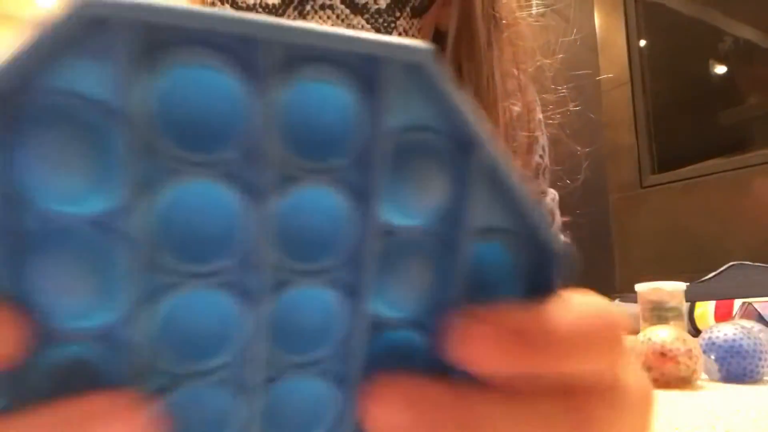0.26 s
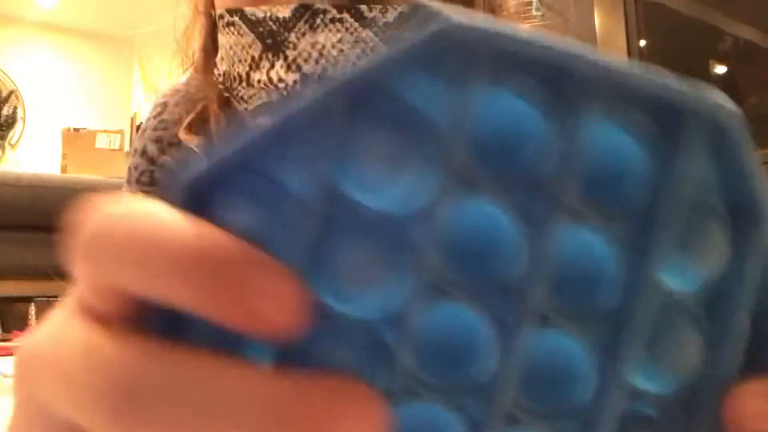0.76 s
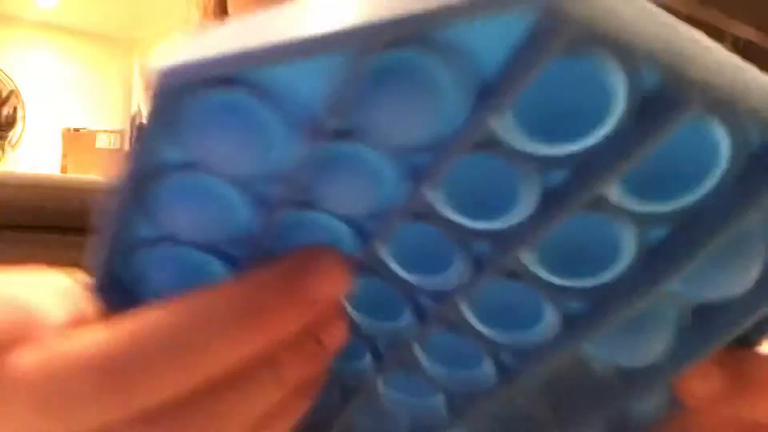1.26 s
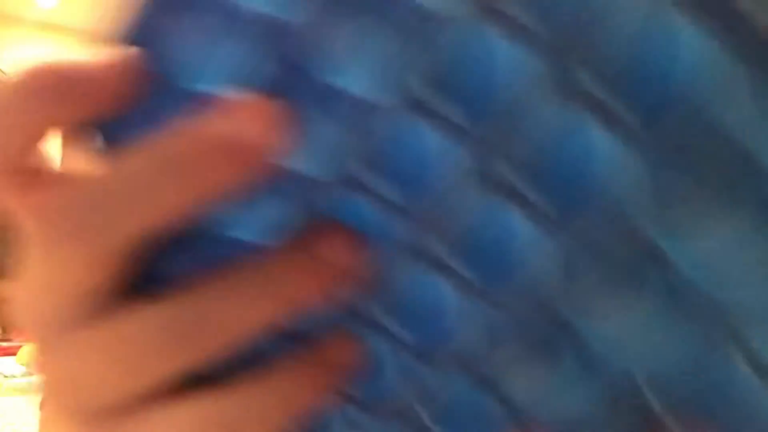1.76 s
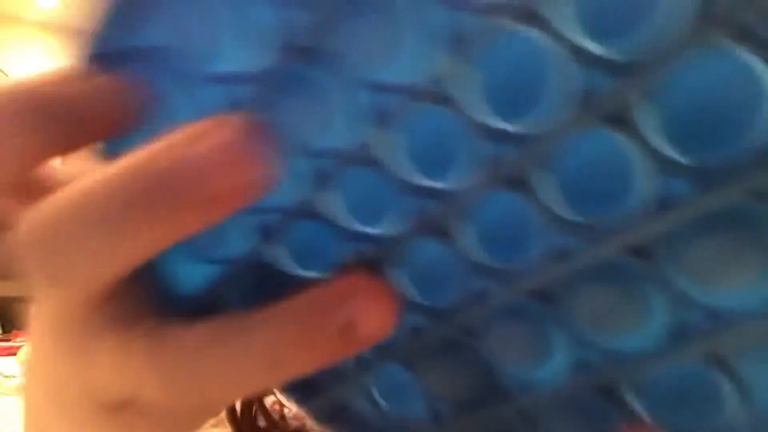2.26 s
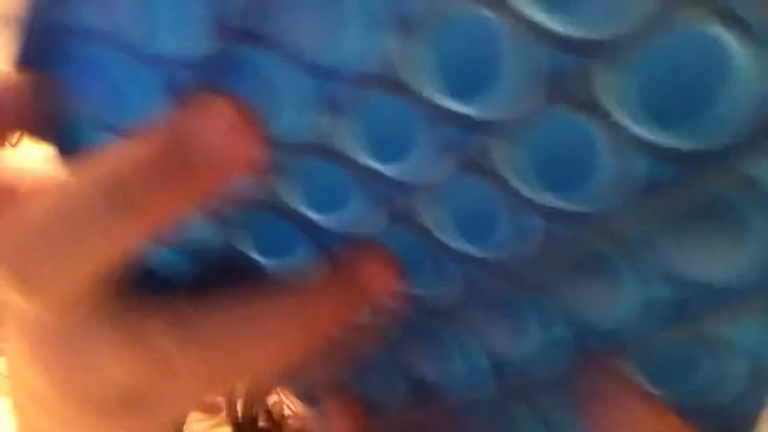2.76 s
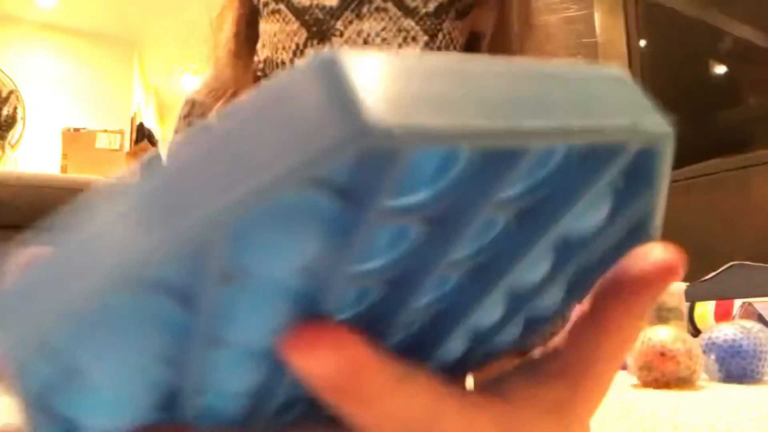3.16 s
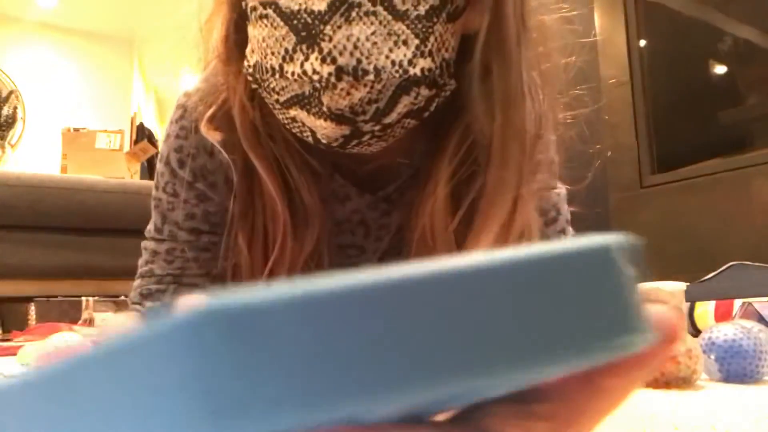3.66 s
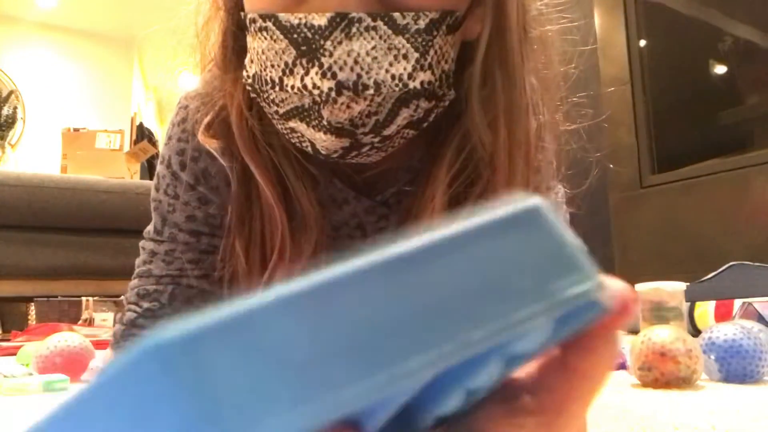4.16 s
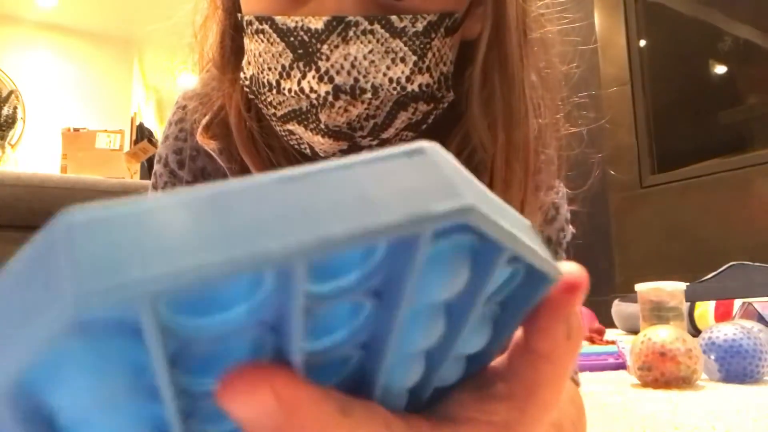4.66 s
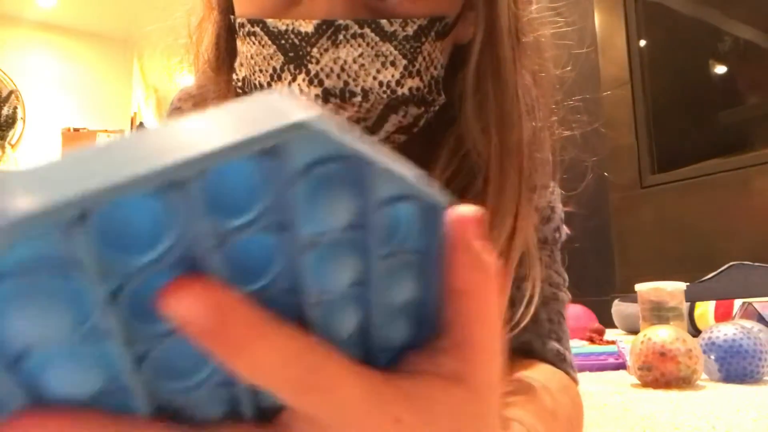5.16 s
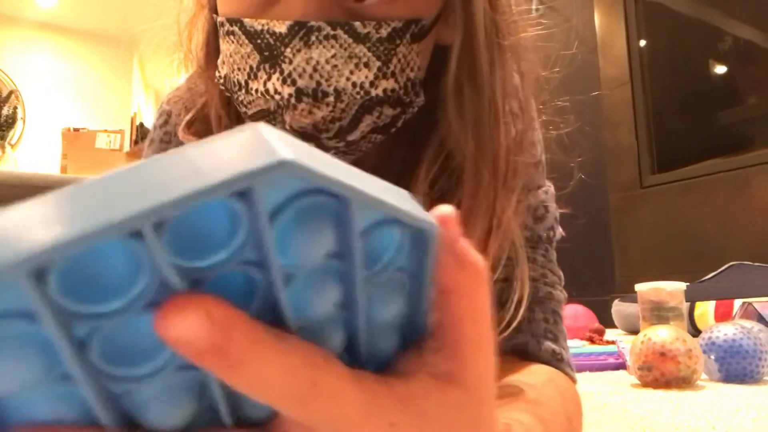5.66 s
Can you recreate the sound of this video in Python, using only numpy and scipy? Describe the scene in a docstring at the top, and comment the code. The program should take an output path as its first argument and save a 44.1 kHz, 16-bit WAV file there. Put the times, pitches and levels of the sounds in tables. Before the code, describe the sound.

Rapid soft, rubbery pops from a bubble toy, very near, with faint skin rubbing mid-pause and a few sharper double pops afterwards.

```python
"""Silicone bubble sheet popping

Fingers push the domes of a silicone sheet through, close to a microphone in a quiet room.
Pops: damped modes of sheet, ribs, dome, cup and rim, plus a crack and bursts of hiss.
Fingertip scuffs are short band-shaped hiss; sliding skin is longer, grainy hiss.
Pops and scuffs get a decaying room tail; a steady hush lies below."""
import sys
import numpy as np
from scipy import signal
from scipy.fft import rfft, irfft
from scipy.io import wavfile
from scipy.ndimage import uniform_filter1d

SR = 44100
rng = np.random.default_rng(int(sys.argv[2]) if len(sys.argv) > 2 else 0)


def transcribe(signal):
    """Save signal, clipped to [-1, 1], as a 16-bit WAV file at the path in sys.argv[1]."""
    frames = np.atleast_2d(signal).T
    limited = np.clip(frames, -1, 1)
    pcm = np.round(limited * 32767).astype(np.int16)
    wavfile.write(sys.argv[1], SR, pcm)


N = 260807  # samples

# Dome snaps, peak levels: (time [s], sheet level [dB], dome level [dB], cup level [dB], cup pitch [Hz],
# rim level [dB], rim pitch [Hz], cup t60 [s], crack pitch [Hz], crack level [dB], hiss level [dB])
SNAPS = [(0.3555, -75, -36, -50, 820, -68, 2010, .012, 3990, -71, -73),
         (0.3802, -46, -28.5, -27, 1176, -30.5, 1940, 0.0058, 3770, -53, -54),
         (0.648, -47, -31, -46.5, 970, -52.5, 1590, 0.021, 3560, -62, -70),
         (0.8583, -50, -48, -65, 1010, -58, 2230, .012, 3890, -76, -75),
         (0.8998, -44.5, -28.5, -33.5, 880, -34, 1920, 0.0084, 3300, -34, -49),
         (1.0608, -43.5, -31.5, -44.5, 970, -48, 1620, 0.017, 3630, -55, -61),
         (1.294, -62, -52, -58, 990, -59, 2400, 0.011, 3870, -60, -70),
         (1.3461, -47, -35, -44, 1000, -72, 2310, .0085, 3850, -78, -65),
         (1.516, -48, -29, -22, 980, -24.5, 2060, 0.0073, 2450, -45, -43.5),
         (1.7443, -63, -45, -45.5, 1180, -51, 1840, .012, 3960, -68, -74),
         (1.797, -73, -23, -16.5, 1155, -20.5, 2350, 0.0094, 4170, -32, -36),
         (2.047, -51, -32.5, -41, 810, -56, 2050, 0.013, 3550, -73, -62),
         (2.0777, -46.5, -43, -34.5, 1006, -52, 2300, 0.0071, 3750, -70, -53),
         (2.3058, -74, -51, -51.5, 1160, -65, 2230, 0.008, 4450, -68, -68),
         (2.3125, -47, -55, -53.5, 1300, -55.5, 2270, .012, 3890, -60, -61),
         (2.606, -50, -42, -50, 890, -70, 2130, .01, 3930, -80, -75),
         (2.6237, -69, -25, -21.5, 1016, -40, 2210, 0.016, 3420, -34, -42.5),
         (2.73, -49.5, -42, -51.5, 990, -65, 2070, 0.013, 3570, -75, -77),
         (2.797, -59, -51, -63, 900, -66, 2300, .01, 3500, -70, -76),
         (2.8035, -68, -40, -48.5, 1130, -52, 2400, .01, 3510, -55, -59),
         (2.81, -49.5, -42.5, -46, 1300, -54, 2350, 0.0058, 3500, -46, -49.5),
         (2.8643, -46, -65, -61, 1080, -67, 2360, .011, 3950, -60, -76),
         (3.161, -43, -54, -72, 1080, -57, 2720, .012, 3820, -58, -66),
         (3.963, -58, -51, -53, 1110, -66, 2380, 0.008, 3590, -55, -78),
         (4.2079, -70, -34.5, -43, 1220, -58, 1670, 0.023, 3440, -48, -57),
         (4.2118, -72, -32.5, -26.5, 970, -21.5, 1690, 0.0091, 3160, -33, -43),
         (4.216, -41, -27, -22.5, 990, -28.5, 1690, 0.011, 4650, -28.5, -37),
         (4.4916, -68, -56, -55.5, 1170, -57.5, 1870, 0.012, 4370, -54, -65),
         (4.6892, -47, -39, -43, 880, -47, 1930, 0.02, 4050, -33.5, -45.5),
         (4.695, -34.5, -23, -22, 1075, -25.5, 1700, 0.016, 3700, -29.5, -37.5),
         (4.9915, -71, -53, -56.5, 1040, -73, 1960, 0.0096, 3670, -56, -69),
         (4.9984, -55, -53, -57, 1014, -67, 2530, .011, 3720, -57, -76),
         (5.1769, -75, -26.5, -29.5, 1450, -45, 1800, 0.019, 3520, -31.5, -39.5),
         (5.1828, -64, -31, -36, 1380, -44, 2280, 0.022, 3520, -42, -50),
         (5.1875, -45.5, -31.5, -22, 1390, -40, 1700, 0.005, 2600, -39, -55),
         (5.5128, -49, -48, -52, 1210, -49.5, 1620, 0.0036, 4130, -48, -60),
         (5.695, -64, -38, -31.5, 1150, -54, 1600, 0.023, 4300, -43, -52),
         (5.6995, -40.5, -30, -28, 1330, -26, 1690, 0.0065, 4050, -32.5, -42),
         (5.7046, -72, -37.5, -33.5, 780, -63, 2000, 0.0074, 3460, -40.5, -66)]
# Fingertip scuffs and slips: (time [s], peak level [dB], centre [Hz], length [s])
FINGER_SCUFFS = [(0.477, -54.5, 4870, .0022), (0.514, -54.5, 1380, 0.0075), (1.226, -54, 5600, .004),
                 (1.596, -60, 3430, .018), (2.003, -50.5, 3300, .015), (2.292, -55, 1500, 0.0068),
                 (2.434, -59, 3330, 0.03), (2.451, -52.5, 1790, 0.0023), (2.772, -54, 3250, .0044),
                 (2.776, -60, 3800, 0.0027), (2.797, -55.5, 2870, 0.022), (2.841, -59, 3200, .003),
                 (2.866, -53.5, 3460, .0029), (3.1, -65, 13000, .05), (3.484, -56.5, 3000, 0.0052),
                 (3.875, -57.5, 780, 0.0058), (4.361, -56, 1290, 0.0087), (5.349, -52.5, 1490, 0.0031),
                 (5.388, -53.5, 3540, 0.013), (5.402, -49.5, 1560, 0.0062), (5.862, -53.5, 2560, 0.0091)]
# Palm sliding while the sheet is turned or regripped: (time [s], rms level [dB])
SLIDE_LEVEL = [(0, -75), (1.1, -73.5), (1.27, -70.5), (1.55, -74.5), (1.75, -70), (2.0, -73.5),
               (2.52, -73.5), (2.8, -69.5), (2.96, -76), (3.07, -69.5), (3.17, -64), (3.26, -64.5),
               (3.3, -75), (3.97, -72.5), (4.35, -70), (4.55, -74.5), (4.85, -68), (4.95, -74), (5.43, -68),
               (5.65, -75), (5.85, -66.5), (5.92, -75.5)]
# Spectrum of skin on rubber: (frequency [Hz], relative density [dB per Hz])
SKIN_SPECTRUM = [(300, -14), (600, 3.5), (1500, -2.5), (3000, -1), (4500, -6), (7000, -8.5), (10000, -23),
                 (16000, -28)]
# Spectrum of room and microphone noise: (frequency [Hz], relative density [dB per Hz])
HUSH_SPECTRUM = [(25, -57), (44, -8.5), (92, 0), (185, -9.5), (354, -10), (550, -20), (900, -23.5),
                 (1440, -23), (3520, -26.5), (7000, -31.5), (9500, -35), (16000, -38)]
# Room decay: (frequency [Hz], t60 [s])
ROOM_T60 = [(150, 0.15), (500, 0.23), (1200, 0.31), (3000, 0.24), (8000, 0.32)]
# Send to the room, wetter once the sheet is tilted away: (time [s], level [dB])
ROOM_SEND = [(0, -22), (2.9, -25.5), (4.1, -20.5), (4.8, -22.5), (5.92, -21)]

HUSH_RMS_DB = -62.5  # ahead of the low cut
LOW_CUT_HZ, EDGE_HZ = 48, 16200

# Modes of the sheet
SHEET_HZ, RIB_HZ, DOME_HZ, WALL_HZ, REBOUND_HZ = 93.5, 211.6, 463, 607, 309
SHEET_T60_S, RIB_T60_S, DOME_T60_S, WALL_T60_S, REBOUND_T60_S = 0.049, 0.019, 0.0047, 0.034, 0.052
PITCH_SPREAD = 0.05  # standard deviation from dome to dome, as a share; the rebound stays fixed
RIB_BY_DOME_DB, RIB_BY_SHEET_DB = -9.5, 0  # both dome and sheet shake the ribs
WALL_BY_DOME_DB, REBOUND_BY_DOME_DB = -15, -21.5
CUP_PAIR_RATIO, CUP_PAIR_DB = 1.379, -8  # second, higher tone of the squeezed cup
RIM_T60_SHARE = 1  # of the cup's t60

# Snap and rubbing
CRACK_T60_S, SNAP_T60_S = 0.004, 0.0099
FIZZ_BY_HISS_DB = -5
SCUFF_WIDTH = 0.82  # resonance width as a share of its centre
GRAINS_PER_S, GRAIN_SPREAD_DB, GRAIN_SHARE = 670, 2, 0.21  # stick-slip catches of skin on rubber


def pops():
    """Each snapping dome swings sheet, ribs, wall, cup air and rim together, with a burst of hiss."""
    lead_s = 0.015
    mix = np.zeros(N)
    t = np.arange(6000) / SR - lead_s
    draws = rng.standard_normal((len(SNAPS), len(t) + 3))
    for row, draw in zip(SNAPS, draws):
        (s, sheet_db, dome_db, cup_db, cup_hz, rim_db, rim_hz,
         cup_t60_s, crack_hz, crack_db, hiss_db) = row
        detune = 1 + PITCH_SPREAD * draw[:3]
        hiss = draw[3:]
        sheet_hz, rib_hz, dome_hz = np.array([SHEET_HZ, RIB_HZ, DOME_HZ]) * detune
        wall_hz = WALL_HZ * dome_hz / DOME_HZ
        rib_gain = amp(dome_db + RIB_BY_DOME_DB) + amp(sheet_db + RIB_BY_SHEET_DB)
        rib_db = 20 * np.log10(rib_gain)
        wall_db = dome_db + WALL_BY_DOME_DB
        rebound_db = dome_db + REBOUND_BY_DOME_DB
        pair_db, pair_hz = cup_db + CUP_PAIR_DB, CUP_PAIR_RATIO * cup_hz

        pop = mode(t, cup_db, cup_hz, cup_t60_s, rise_turns=0.45, lag_turns=0.013)
        pop += mode(t, pair_db, pair_hz, cup_t60_s, rise_turns=0.57, lag_turns=0.3)
        pop += mode(t, rim_db, rim_hz, RIM_T60_SHARE * cup_t60_s, rise_turns=0.42, lag_turns=0.15)
        pop -= mode(t, dome_db, dome_hz, DOME_T60_S, rise_turns=0.19, lag_turns=0.51)
        # The flipped dome bounces
        pop += mode(t, rebound_db, REBOUND_HZ, REBOUND_T60_S, rise_turns=0.42, lag_turns=1.428)
        pop += mode(t, wall_db, wall_hz, WALL_T60_S, rise_turns=0.41, lag_turns=1.026)
        pop += mode(t, rib_db, rib_hz, RIB_T60_S, rise_turns=0.18, lag_turns=0.43)
        pop += mode(t, sheet_db, sheet_hz, SHEET_T60_S, rise_turns=0.21, lag_turns=0.87)
        pop += mode(t, crack_db, crack_hz, CRACK_T60_S, rise_turns=1.0, lag_turns=0.16)

        snap = swell(t + 0.00067, 0.00063, SNAP_T60_S)
        pop += burst(hiss, snap, hiss_db, hz=5580, width_hz=1900)
        pop += burst(hiss, snap, hiss_db + FIZZ_BY_HISS_DB, hz=12200, width_hz=9500)
        add(mix, s - lead_s, pop)
    return mix


def mode(t, db, hz, t60_s, rise_turns, lag_turns):
    """A damped swing whose rise and lag after the snap are counted in its own cycles."""
    t = t - lag_turns / hz
    rise_s = rise_turns / hz
    envelope = swell(t + 1.07 * rise_s, rise_s, t60_s)
    return amp(db) * envelope * np.cos(2 * np.pi * hz * t)


def swell(t, rise_s, t60_s):
    """Smooth build-up around t = 0 to a peak of 1, then exponential decay."""
    decay = amp(-60 * np.maximum(t, -4 * rise_s) / t60_s)
    shape = (1 + np.tanh(t / rise_s)) * decay
    return shape / shape.max()


def burst(hiss, shape, db, hz, width_hz):
    """Hiss through one broad, steep-sided resonance, under an envelope, set to a peak level."""
    f = np.fft.rfftfreq(len(hiss), 1 / SR)
    resonance = 1 / (1 + ((f - hz) / width_hz) ** 2) ** 2
    sound = shape * irfft(rfft(hiss) * resonance, len(hiss))
    return amp(db) * sound / abs(sound).max()


def scuffs():
    """Brief fingertip rubs: band-shaped hiss under a bell curve."""
    mix = np.zeros(N)
    t = (np.arange(4410) - 2205) / SR
    hisses = rng.standard_normal((len(FINGER_SCUFFS), len(t)))
    for (s, db, hz, length_s), hiss in zip(FINGER_SCUFFS, hisses):
        bell = np.exp(-0.5 * (2 * t / length_s) ** 2)
        add(mix, s + t[0], burst(hiss, bell, db, hz, SCUFF_WIDTH * hz))
    return mix


def slide():
    """Skin slides over rubber: hiss roughened by random stick-slip catches, at a varying level."""
    s, level_db = np.transpose(SLIDE_LEVEL)
    strength = amp(GRAIN_SPREAD_DB * np.minimum(rng.exponential(1, N), 4))
    catches = strength * (rng.random(N) < GRAINS_PER_S / SR)
    grain = evened(signal.oaconvolve(catches, np.hanning(60), "same"))
    hiss = noise(SKIN_SPECTRUM, patchy_db=1.5, flicker_db=2.0)
    level = amp(np.interp(np.arange(N) / SR, s, level_db))
    return level * evened(hiss * (1 + GRAIN_SHARE * grain))


def room(x):
    """Sparse random-sign taps, one in every 20 samples, each band dying at its own speed."""
    taps = np.zeros(SR // 2)
    at = np.arange(500, SR // 2 - 20, 20)
    taps[at + rng.integers(0, 20, len(at))] = rng.choice([-1., 1.], len(at))
    hz, t, z = signal.stft(taps, SR, nperseg=256)
    decay = amp(-60 * t / read(ROOM_T60, hz)[:, None])
    tail = signal.istft(z * decay, SR, nperseg=256)[1]
    return signal.fftconvolve(x, tail / np.linalg.norm(tail))[:N]


def hush():
    """Steady room and microphone noise with slight patches and flicker."""
    return amp(HUSH_RMS_DB) * noise(HUSH_SPECTRUM, patchy_db=1.63, flicker_db=0.98)


def noise(spectrum, patchy_db, flicker_db):
    """Random short-time spectra with drifting patches and a flicker shared by all bins; rms 1."""
    frames, hz = N // 256 + 5, np.fft.rfftfreq(1024, 1 / SR)
    real, imag, patches = rng.standard_normal((frames, 513, 3)).T
    patches = uniform_filter1d(patches, size=12, axis=0)  # across bins
    patches = evened(uniform_filter1d(patches, size=10, axis=1))  # across frames
    flicker = rng.standard_normal(frames)
    level_db = read(spectrum, hz)[:, None] + patchy_db * patches + flicker_db * flicker
    z = (real + 1j * imag) * amp(level_db)
    return evened(signal.istft(z, nperseg=1024, noverlap=768)[1][:N])


def amp(db):
    """Decibels to gain."""
    return 10 ** (np.asarray(db) / 20)


def evened(x):
    """Scales to rms 1."""
    return x / np.sqrt(np.mean(x ** 2) + 1e-20)


def read(points, hz):
    """Reads a (frequency [Hz], value) table on a log-frequency axis."""
    f, value = np.transpose(points)
    return np.interp(np.log(hz + 1), np.log(f + 1), value)


def add(mix, s, sound):
    """Mixes a sound in at s seconds."""
    part = mix[round(s * SR):][:len(sound)]
    part += sound[:len(part)]


def scene():
    """Pops and scuffs with their room tail, over sliding skin and a steady hush."""
    near = pops() + scuffs()
    s, wet_db = np.transpose(ROOM_SEND)
    sent = near * amp(np.interp(np.arange(N) / SR, s, wet_db))
    return (near + room(sent) + slide() + hush())[None]


def record(dry):
    """The microphone drops the deep bass; a linear-phase low-pass then limits the band."""
    low_cut = signal.butter(N=3, Wn=LOW_CUT_HZ, btype="high", fs=SR, output="sos")
    thin = signal.sosfilt(low_cut, dry)
    band_limit = signal.firwin(511, EDGE_HZ, window=("kaiser", 9), fs=SR)
    return signal.oaconvolve(thin, band_limit[None], "same")


dry = scene()
out = record(dry)
transcribe(out)
```